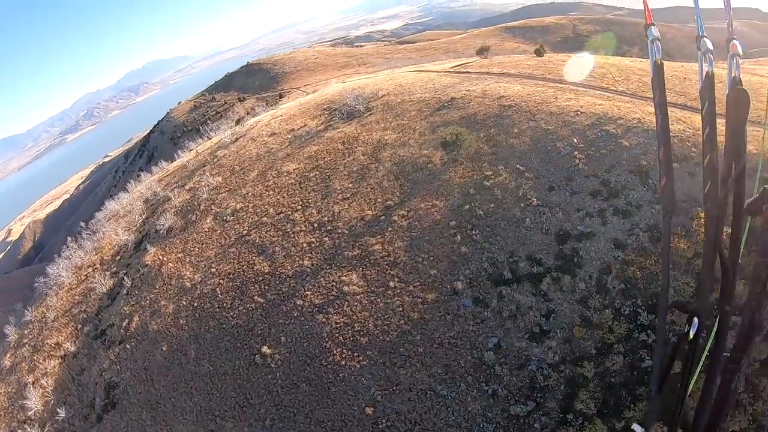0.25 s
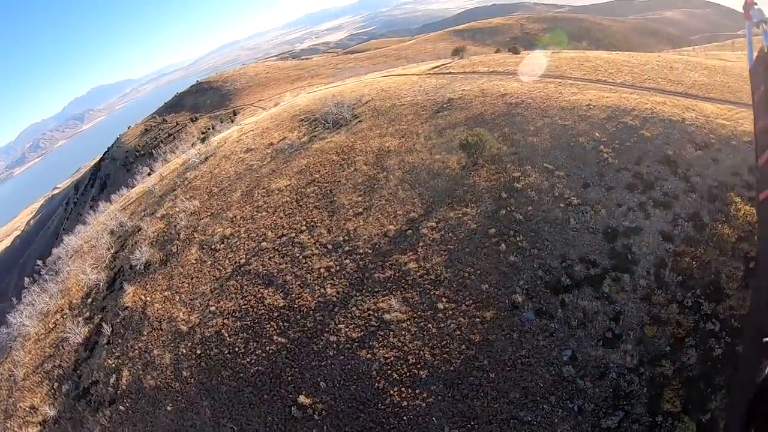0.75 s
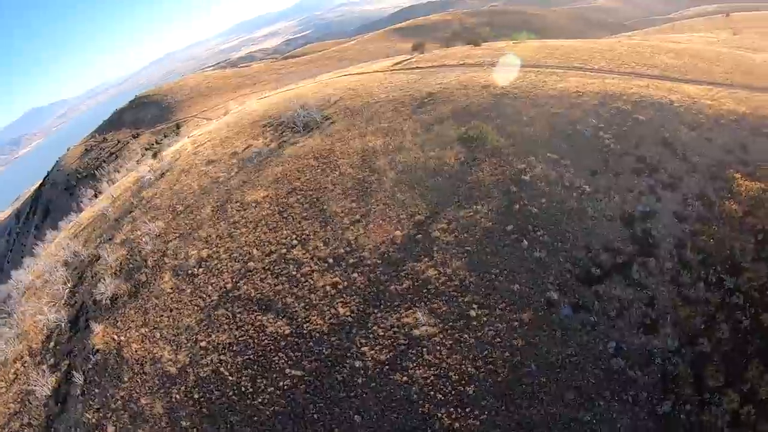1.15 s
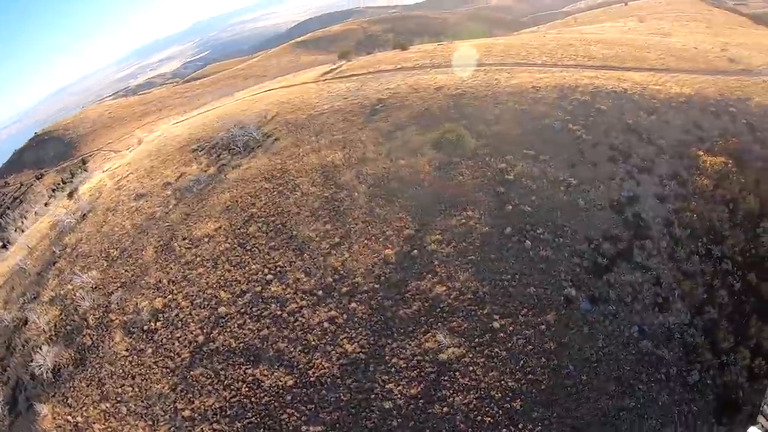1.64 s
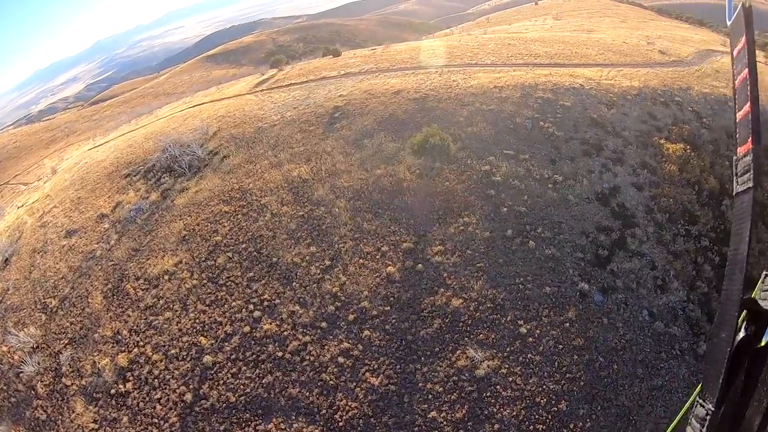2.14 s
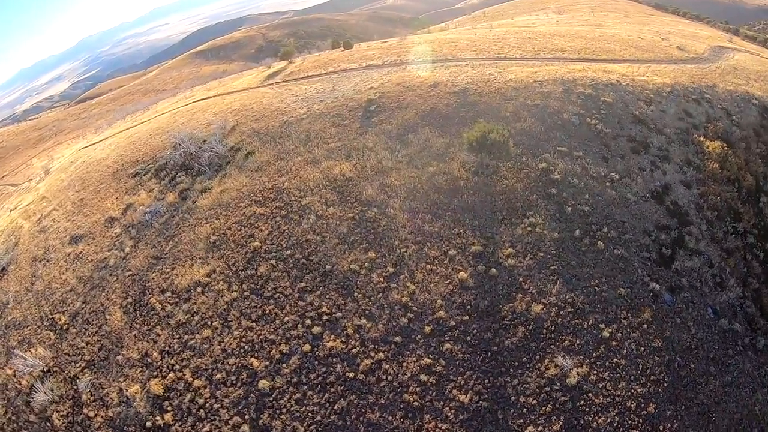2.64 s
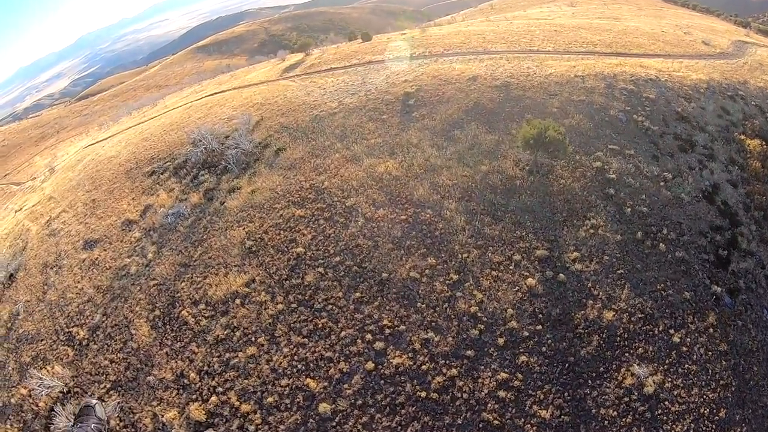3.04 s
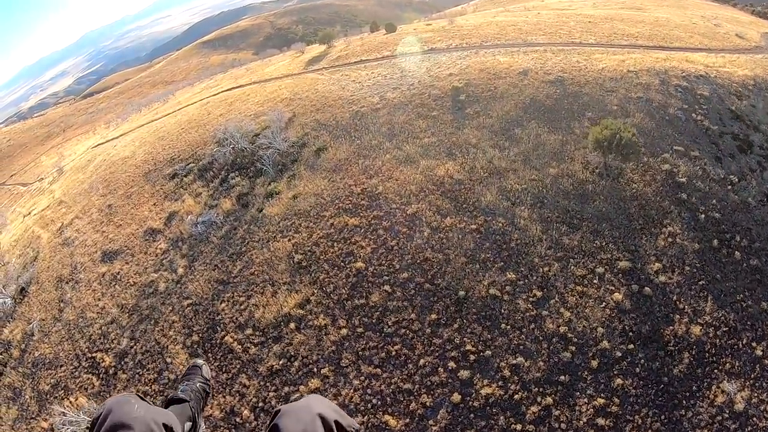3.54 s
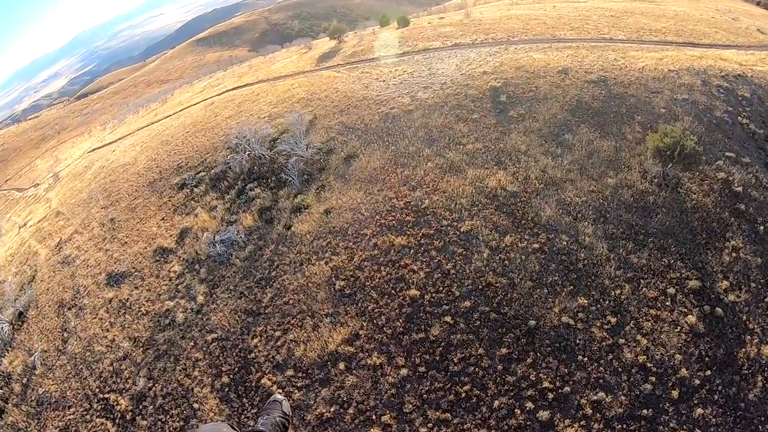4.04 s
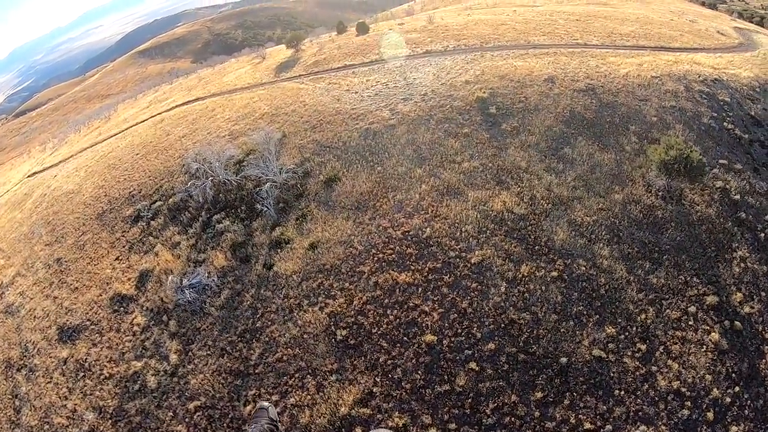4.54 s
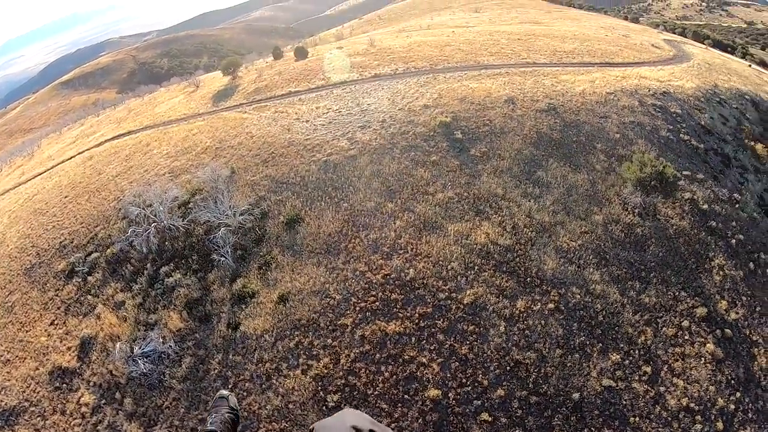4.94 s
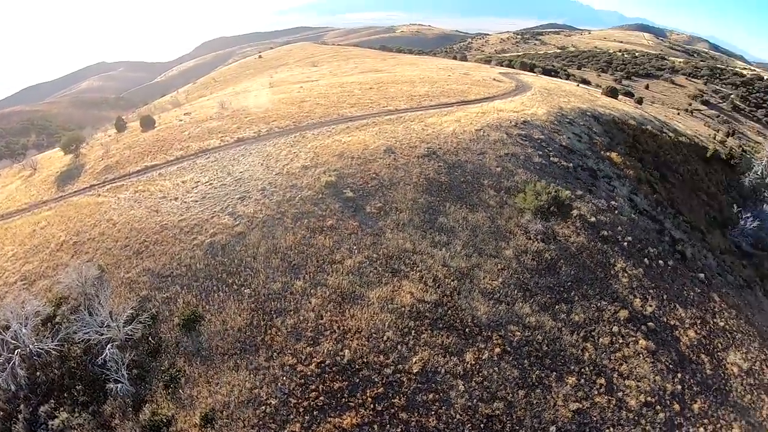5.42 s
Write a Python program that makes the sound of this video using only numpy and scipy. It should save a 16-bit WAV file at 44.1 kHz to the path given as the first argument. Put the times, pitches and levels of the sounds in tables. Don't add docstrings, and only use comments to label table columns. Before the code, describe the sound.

A close onboard microphone in open air catches a small flying motor easing down. First comes loud, rapid blade thumping with rough roar and high whistle, then a falling glide as passes slow and thin out. What remains is uneven engine ticking, hollow pipe knocks and a rattling frame under low wind rumble. Near the end gusts rise and the firing becomes stronger and closer together.

```python
import sys
import numpy as np
from scipy import signal
from scipy.fft import rfft, irfft
from scipy.io import wavfile
from scipy.ndimage import uniform_filter1d

SR = 44100
rng = np.random.default_rng(int(sys.argv[2]) if len(sys.argv) > 2 else 0)


def level_to_linear(level):
    exponent = np.asarray(level, float) / 20
    return 10 ** exponent


def waveform_to_disk(signal):
    frames = np.transpose(np.atleast_2d(signal))
    scaled = np.clip(frames, -1, 1) * 32767
    samples = np.round(scaled).astype(np.int16)
    wavfile.write(sys.argv[1], SR, samples)


N = 250488
T = np.arange(N) / SR


def evened(x):
    return x / np.sqrt(np.mean(x ** 2) + 1e-20)


def curves(rows):
    s, *columns = np.transpose(rows)
    return [np.interp(T, s, c) for c in columns]


def noise(points, patchy_db, size=512):
    frames = 4 * N // size + 5
    hz = np.fft.rfftfreq(size, 1 / SR)
    real, imaginary, patches = rng.standard_normal((frames, len(hz), 3)).T
    patches = uniform_filter1d(patches, size=8, axis=0)
    patches = evened(uniform_filter1d(patches, size=10, axis=1))
    f, db = np.transpose(points)
    colour_db = np.interp(np.log(hz + 1), np.log(f + 1), db, right=-100)
    z = (real + 1j * imaginary) * level_to_linear(colour_db[:, None] + patchy_db * patches)
    return evened(signal.istft(z, nperseg=size, noverlap=3 * size // 4)[1][:N])


def flicker(hz):
    f = np.fft.rfftfreq(N, 1 / SR)
    return evened(irfft(rfft(rng.standard_normal(N)) / (1 + (f / hz) ** 4), N))


def resonate(x, hz, width):
    turn = np.exp(2j * np.pi * np.cumsum(hz * np.ones(len(x))) / SR)
    r = np.exp(-np.pi * width / SR)
    return 2 * (turn * signal.lfilter([1 - r], [1, -r], x / turn)).real


def ring(x, modes):
    return sum(level_to_linear(db) * resonate(x, hz, width) for hz, width, db in modes)


def sweep(turns, centre, depth_db, sharp):
    near = .5 + .5 * np.cos(2 * np.pi * (turns - centre))
    return level_to_linear(depth_db * (1.5 + near ** sharp))


def from_nearest(turns):
    return (turns + .5) % 1 - .5


def whistle_gate(turns):
    place = from_nearest(turns)
    fall_db = 120
    nearest = level_to_linear(-fall_db * abs(place))
    clearing = level_to_linear(-8.5 - fall_db * abs(place - .27))
    return nearest + clearing + level_to_linear(-22)


# (t/s, blade passes per second)
BLADE_RATE = [(0.0, 43.42), (0.2, 42.01), (0.4, 40.29), (0.6, 39.36), (0.8, 40.13), (0.95, 39.8),
              (1.1, 36.13), (1.25, 32.91), (1.4, 29.94), (1.6, 27.05), (1.8, 24.19), (2.0, 22.24),
              (2.2, 20.77), (2.45, 18.42), (2.8, 17.72)]


def propeller():
    rate, = curves(BLADE_RATE)
    turns = -.1 + np.cumsum(rate) / SR
    slowed = np.log2(40 / rate)
    coast_db = 32 * np.maximum(T - 2.81, 0)
    pitch_hz = edge_pitch(rate, turns)
    blades = thump(turns, slowed) + roar(turns, slowed)
    blades += whistle(turns, slowed, pitch_hz) + swish(turns, slowed, pitch_hz)
    return level_to_linear(-coast_db) * blades + cage_spar(turns)


# (multiple of the pass rate, level/dB, lag in turns)
THUMP_TONES = [
    (1, 1, 0.12),
    (2, -7.5, 0.178),
    (3, -7.5, 0.22),
    (4, -10, 0.22),
    (5, -17, 0.258),
]


def thump(turns, slowed):
    tones = sum(level_to_linear(db + flicker(hz=6)) * np.cos(2 * np.pi * k * (turns - lag)) for k, db, lag in THUMP_TONES)
    return level_to_linear(-17.5 - 11 * slowed) * evened(tones)


# (f/Hz, level/dB per Hz)
ROAR_COLOUR = [(100, -29), (200, -5), (400, -3), (800, -7.5), (1400, -14), (1600, -13.5), (1900, -17),
               (3000, -22.5), (6000, -31.5), (10000, -28), (14000, -30.5), (15700, -37)]
# (f/Hz, width/Hz, level/dB)
FRAME_MODES = [(1134.5, 63, 7), (1670, 74, -12), (3000, 55, -40), (7540, 920, -2.5), (10750, 240, 0)]


def roar(turns, slowed):
    frame = evened(ring(rng.standard_normal(N), FRAME_MODES[1:2]))
    air = noise(ROAR_COLOUR, patchy_db=1.0) + level_to_linear(-21.5) * frame
    hold, fade = .12, .16
    away = np.clip((abs(from_nearest(turns) - .03) - hold) / fade, 0, 1)
    gate = level_to_linear(-7 * away)
    air *= gate ** 0.95 * level_to_linear(flicker(hz=91))
    return level_to_linear(-23.5 - 17.5 * slowed) * evened(air)


def blade_side(turns):
    return np.cos(np.pi * (turns - .1))


# (t/s, f/Hz per blade pass a second)
EDGE_PITCH_RATIO = [(0, 311), (.3, 309.5), (.9, 321), (1.15, 338), (1.45, 326), (1.75, 316), (2.1, 315),
                    (2.8, 310)]


def edge_pitch(rate, turns):
    swing = np.sin(2 * np.pi * (turns - .05))
    return rate * curves(EDGE_PITCH_RATIO)[0] * (1 + .03 * blade_side(turns) - .045 * swing)


def whistle(turns, slowed, pitch_hz):
    edge = resonate(rng.standard_normal(N), pitch_hz, width=800)
    edge = resonate(edge, pitch_hz, width=1250)
    edge *= whistle_gate(turns) * level_to_linear(1.8 * flicker(hz=30) - 1.2 * blade_side(turns))
    unload_db = 4.5 * np.minimum(T / 0.98, 1)
    return level_to_linear(-23.5 + slowed - 36 * slowed ** 2 - unload_db) * evened(edge)


def swish(turns, slowed, pitch_hz):
    rip = resonate(rng.standard_normal(N), .75 * pitch_hz, width=3700)
    rip = resonate(rip, .75 * pitch_hz, width=6100)
    rip *= sweep(turns, centre=-.02, depth_db=14, sharp=3.5)
    level_db = -53.5 + 7.5 * slowed - 50 * np.maximum(slowed - 0.77, 0)
    return level_to_linear(level_db) * evened(rip)


# (t/s, level/dB)
WIND_STRENGTH = [(0, -19), (.3, -23.5), (.9, -20.5), (1.15, -18), (1.55, -22.5), (1.95, -29), (2.5, -33.5),
                 (3.0, -32.5), (3.32, -24.5), (3.5, -25.5), (3.66, -30), (3.82, -27.5), (4.3, -31),
                 (4.85, -29.5), (5.08, -24), (5.22, -26), (5.38, -24), (5.68, -32)]
# (t/s, level/dB, length/s)
GUST_LUMPS = [(0.214, -3, 0.029), (.75, 3.5, 0.066), (1.11, -0.5, .06), (1.296, -0.5, 0.06),
              (1.487, 1.5, 0.05), (1.66, 2.5, .05), (1.726, -2.5, .03), (1.82, -5, 0.045),
              (2.114, 2.5, 0.036), (2.236, 3.5, 0.038), (2.443, 3.5, 0.027), (2.65, 3, 0.061),
              (2.95, 3.5, 0.094), (3.18, 2.5, 0.026), (3.327, 5, 0.027), (3.646, -8, 0.0096),
              (3.83, 4, 0.15), (4.0, -5, 0.072), (4.254, 5.5, 0.22), (4.912, -2.5, 0.093),
              (5.05, 4.5, 0.059), (5.434, -3.5, 0.069), (5.614, 0.5, .06)]
# (f/Hz, level/dB per Hz)
BUFFET_COLOUR = [(3, 4), (6, 4), (20, 2.5), (50, -7.5), (110, -12), (200, -19), (400, -36), (800, -93)]
# (f/Hz, level/dB per Hz)
RUSH_COLOUR = [(50, -22), (110, 2.5), (200, -1), (350, -6), (500, -13.5), (800, -23), (1300, -36.5),
               (2500, -38), (5000, -47.5)]


def wind():
    wind_db, = curves(WIND_STRENGTH)
    lumps_db = sum(db * np.exp(-((T - s) / length) ** 2) for s, db, length in GUST_LUMPS)
    buffet = noise(BUFFET_COLOUR, patchy_db=1.5, size=4096) * level_to_linear(.8 * flicker(hz=12))
    rush = noise(RUSH_COLOUR, patchy_db=0.5, size=1024) * level_to_linear(1.48 * flicker(hz=22.0))
    buffet_db = -20 + 0.6 * (wind_db + 28) + lumps_db
    buffet_db -= 5 * np.exp(-T ** 6)
    rush_db = wind_db - 2 + 0.074 * lumps_db
    return level_to_linear(buffet_db) * evened(buffet) + level_to_linear(rush_db) * evened(rush)


# (t/s, crank turns per second, level/dB)
ENGINE_IDLE = [(0, 53, -33.5), (1, 57, -38.5), (1.6, 54, -42.5), (2, 35, -42), (2.5, 40.4, -50.5),
               (3.5, 36.5, -48), (4.5, 50, -48), (5.2, 31.6, -45), (5.68, 37, -47)]
# (f/Hz, level/dB per Hz)
CLATTER_COLOUR = [(400, -16), (800, -1.5), (1200, -5), (2000, -8.5), (3000, -11), (3600, -16.5),
                  (5000, -15.5), (7500, -16), (11000, -15), (13500, -18), (15700, -28)]


def clatter():
    rate, level_db = curves(ENGINE_IDLE)
    turns = np.cumsum(rate) / SR
    strength_db = 1.2 * rng.random(400)[turns.astype(int)]
    gate = sweep(turns, centre=.5, depth_db=1.5 + strength_db, sharp=4.5) * level_to_linear(strength_db)
    hiss = noise(CLATTER_COLOUR, patchy_db=.9)
    frame = evened(ring(hiss * gate ** 2, FRAME_MODES))
    return level_to_linear(level_db) * evened(hiss * gate + level_to_linear(-8) * frame)


# (t/s, peak level/dB, f/Hz)
LOOSE_PINGS = [(1.381, -34, 1616), (1.469, -46, 1580), (1.60, -37, 1560), (1.677, -35, 1660),
               (1.72, -37, 1650), (1.828, -37, 1670), (1.914, -44, 1660), (1.979, -47, 1670),
               (2.181, -38, 1650), (2.31, -44, 1650), (2.399, -48, 1600), (2.93, -49, 2740),
               (4.53, -49, 1750), (4.945, -47, 1630), (5.013, -47, 3000), (5.03, -49, 1640),
               (5.136, -53, 3000), (5.142, -41, 1540), (5.261, -44, 1643), (5.32, -47, 3000),
               (5.455, -48, 1620), (5.58, -53, 2200)]


def pings():
    t = np.arange(2500) / SR
    out = np.zeros(N + len(t))
    shape = (t / .006) * np.exp(1 - t / .006)
    for s, db, hz in LOOSE_PINGS:
        shake = resonate(rng.standard_normal(len(t)), hz, width=90)
        shake = resonate(shake, hz, width=90)
        out[round(s * SR):][:len(t)] += level_to_linear(db) * shape * evened(shake)
    return out[:N]


# (t/s, exhaust puff level/dB, pipe knock level/dB against the puff)
IDLE_FIRINGS = [(1.8298, -27, -5), (1.9017, -26.5, 13), (1.9679, -27, -12), (2.1877, -38, 19),
                (2.3126, -38.5, 17.5), (2.3988, -38, 16), (2.6094, -43, 18), (2.713, -43.5, 22.5),
                (2.8089, -38, 12), (2.9232, -36.5, 15), (3.033, -31, 2), (3.314, -36, 22), (3.444, -41, 15),
                (3.558, -37, 10), (3.789, -36.5, 18), (3.9662, -30.5, 7), (4.0796, -34, 14),
                (4.1828, -35.5, 19), (4.429, -35, 11), (4.6172, -31.5, 15), (4.72, -35.5, 13),
                (4.8054, -32.5, 16.5), (4.9305, -33, 5), (5.0104, -22.5, 9), (5.1367, -25, 6.5),
                (5.24, -30, -11), (5.3206, -24, 7.5), (5.3687, -33, 5), (5.4475, -27, 12),
                (5.5733, -27.5, 12.5)]
# (f/Hz, level/dB per Hz)
PUFF_COLOUR = [(800, 5), (1600, 2), (3000, 2), (4500, -12), (6200, -11), (8500, -3.5), (13000, -3.5),
               (15700, -10)]
# (f/Hz, level/dB, time to fall 60 dB/s)
PIPE_TONES = [
    (415, 1.5, 0.032),
    (715, -3, 0.008),
    (990, -22, 0.026),
    (1540, -26, 0.13),
]


def firings():
    t = np.arange(3000) / SR
    blow = (1 - np.exp(-t / .004)) / (1 + (t / .017) ** 4)
    knock = sum(level_to_linear(db - 60 * t / t60) * np.sin(2 * np.pi * hz * t) for hz, db, t60 in PIPE_TONES)
    puffs, knocks = np.zeros((2, N + 2 * len(t)))
    for s, puff_db, knock_db in IDLE_FIRINGS:
        puffs[round(s * SR):][:len(t)] += level_to_linear(puff_db) * blow
        knocks[round((s + .008) * SR):][:len(t)] += level_to_linear(puff_db + knock_db) * knock
    puff = puffs[:N] * noise(PUFF_COLOUR, patchy_db=0.5, size=256)
    return level_to_linear(-13.0) * puff + level_to_linear(-19) * ring(puff, FRAME_MODES) + level_to_linear(-5.5) * knocks[:N]


def cage_spar(turns):
    hum = evened(resonate(rng.standard_normal(N), 7500, width=120) * whistle_gate(turns))
    return hum * level_to_linear(-66.5 + 4.5 * flicker(hz=8)) * np.exp(-((T - 2.7) / .7) ** 4)


def scene():
    return (propeller() + wind() + clatter() + pings() + firings())[None]


def band_limit(x):
    return signal.sosfilt(signal.butter(12, 15770, fs=SR, output="sos"), x)


def record(dry):
    heard = signal.lfilter(*signal.butter(1, 7, "high", fs=SR), dry)
    limited = np.tanh(heard / 1.4) * 1.4
    return band_limit(limited)


dry = scene()
out = record(dry)
waveform_to_disk(out)
```